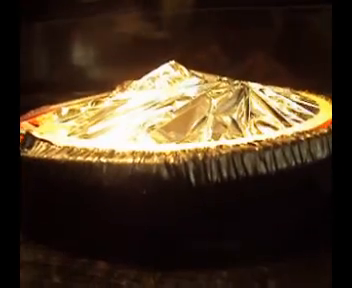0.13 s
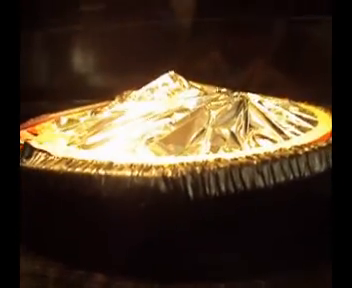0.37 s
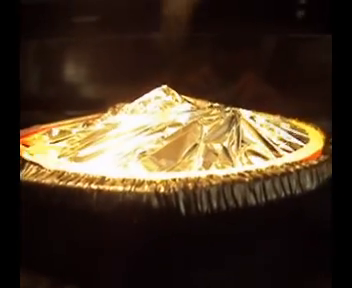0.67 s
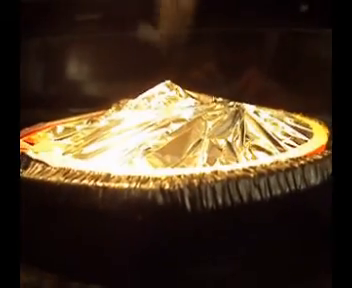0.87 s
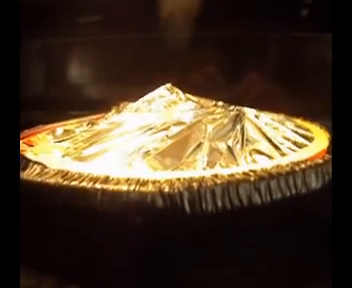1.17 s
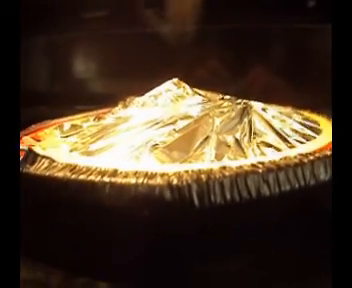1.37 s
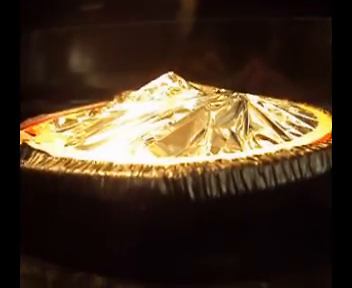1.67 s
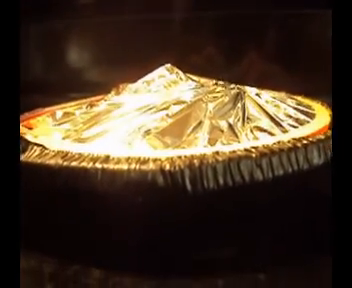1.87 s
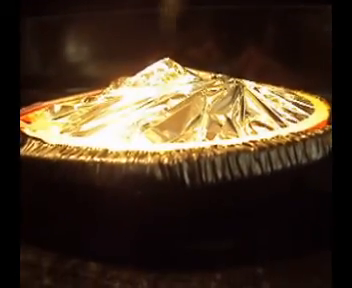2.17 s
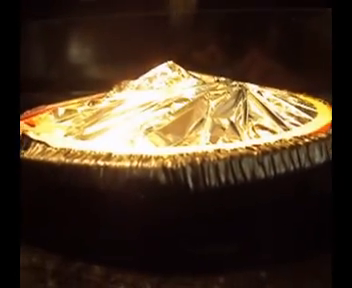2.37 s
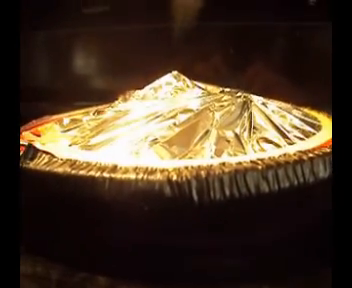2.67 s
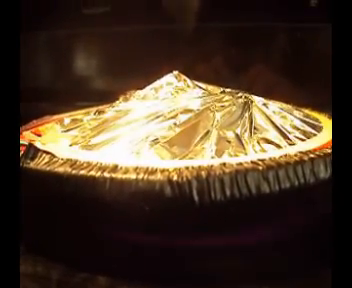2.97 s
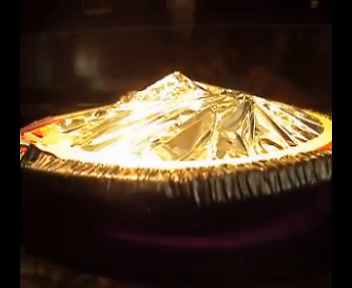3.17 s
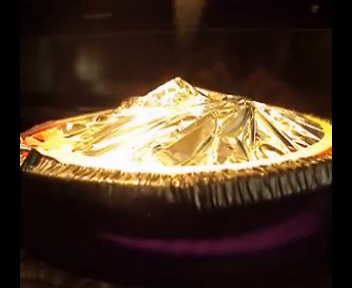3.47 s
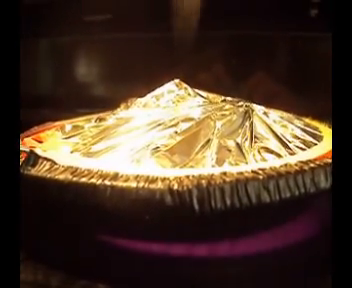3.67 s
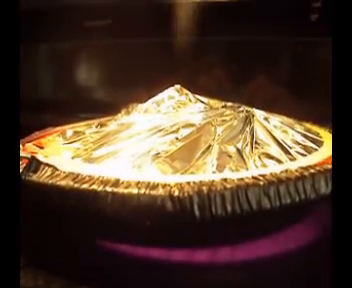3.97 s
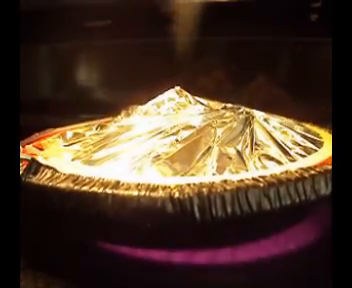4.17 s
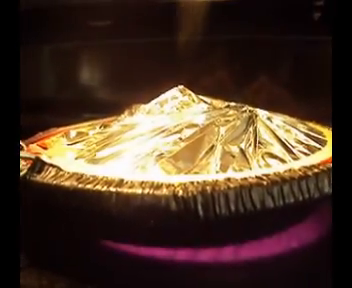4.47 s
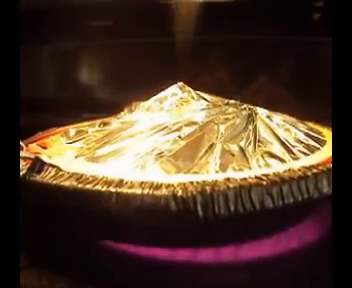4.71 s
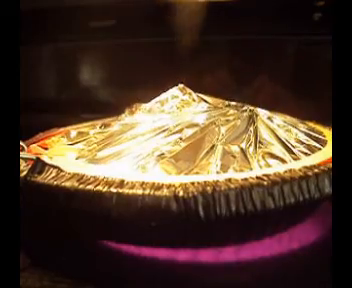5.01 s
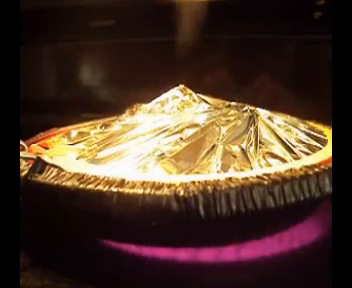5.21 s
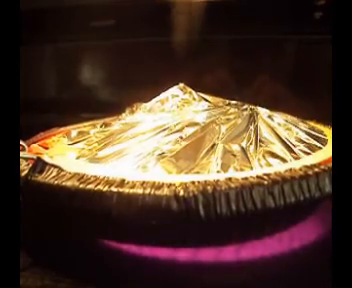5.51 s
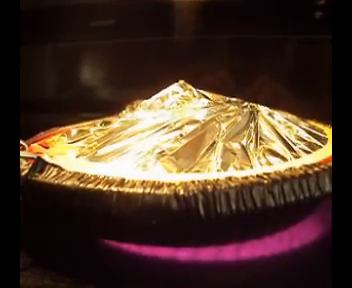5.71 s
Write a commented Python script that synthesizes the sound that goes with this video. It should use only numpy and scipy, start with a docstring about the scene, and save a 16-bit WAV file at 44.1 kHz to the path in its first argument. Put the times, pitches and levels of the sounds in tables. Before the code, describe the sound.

Popcorn pops in a foil-covered pan on a kitchen stove, heard through a close, slightly dull microphone. The first few pops are widely spaced, then they come more often, ending with a quick run of three and a tight pair. Each crack rings briefly in the metal, followed by kernels tapping and rattling and a slight foil rustle. Faint stove hiss and tiny spits of oil continue underneath, with a short room echo.

```python
"""A stove hisses faintly in a small kitchen; hot kernels shift in a shallow pan under a tent of foil.
At 0.6 s the first one pops: the hull cracks, its steam thumps the pan and kicks the foil, the kernel
flies into the tent and its neighbours rattle back. Fourteen more follow unevenly, with knocks between,
bunching up near 4.7 s and 5.7 s. A close, narrow-band microphone overloads on the loudest pops."""
import sys
import numpy as np
from scipy import signal
from scipy.fft import rfft, irfft
from scipy.io import wavfile

SR = 44100
rng = np.random.default_rng(int(sys.argv[2]) if len(sys.argv) > 2 else 0)


def store_wav(level_fs):
    """Save 16-bit WAV to argv[1]."""
    pcm = np.round(np.clip(np.atleast_2d(level_fs), -1, 1) * 32767)
    wavfile.write(sys.argv[1], SR, pcm.T.astype(np.int16))


N = 257984
AGE = np.arange(SR // 3) / SR   # time since a blow [s]
KNOCK_HZ = 1047   # usual pitch of struck foil

# bursting kernels: (time [s], steam swell [s], thump pitch [Hz], thump level [dB], pan pitch [Hz],
# pan level [dB], foil pitch [Hz], foil level [dB], husk level [dB], crack level [dB],
# rustle level [dB], flight to the foil [s], level of that hit [dB])
POPS = [(0.6141, 0.0046, 288, -19, 431.5, -19.5, 1026, -18.5, -24, -24.5, -49, .0174, -28.5),
        (0.9775, 0.0046, 148, -29.5, 481, -21.5, 1027, -9.5, -17, -24.5, -45, .0121, -29),
        (1.817, 0.00207, 302, -25, 520, -19, 1020, -21, -32, -42, -71, .0085, -28.5),
        (2.26, 0.0044, 190, -23, 396, -22, 952, -13.5, -22, -21.5, -36, .0162, -32),
        (2.5681, 0.0043, 171, -23, 487.6, -13.5, 970, -10, -17.5, -21, -30.5, .0120, -36),
        (2.8634, 0.0028, 182, -33, 465, -30.5, 1041, -13, -23.5, -20.5, -46, .0263, -32),
        (3.2643, 0.0025, 177, -25, 460, -24, 1023, -14, -16, -23, -39, .0127, -23),
        (3.6566, 0.0025, 143, -27.5, 534, -18, 1070, -11, -17, -15.5, -32, .0160, -29),
        (4.0162, 0.0046, 255, -26.5, 439, -21, 1082, -13.5, -25.5, -29.5, -42.5, .0156, -26),
        (4.5681, 0.0017, 218, -30, 525, -26, 1006, -16, -36, -28, -62, .0071, -20),
        (4.6774, 0.0042, 163, -29.5, 498, -24, 992, -13.5, -14.5, -16, -31, .0141, -23.5),
        (4.7767, 0.0047, 100, -31, 494, -22, 1040, -12, -16.5, -19.5, -52, .0138, -42),
        (5.404, 0.0038, 132, -22.5, 363, -23.5, 1040, -14.5, -22.5, -24, -35, .0070, -30),
        (5.692, 0.0043, 164, -22, 510, -23.5, 1034, -10.5, -17, -26.5, -38.5, .0172, -31),
        (5.7472, 0.0035, 154, -36, 539, -18.5, 1092, -17.5, -23, -24, -43, .0077, -17.5)]


def pops():
    """The hull cracks; a steam puff drives pan and foil; the kernel hits the foil, which rustles on."""
    out = np.zeros(N)
    for (s, swell_s, thump_hz, thump_db, pan_hz, pan_db, foil_hz, foil_db,
         husk_db, crack_db, rustle_db, flight_s, hit_db) in POPS:
        split = swell(0.00052 + swell_s * 0.18, steepness=0.47)
        add(out, s, at_level(crackle(split, low_hz=2200), crack_db))
        husk = gush(swell_s * 0.75, steepness=0.91) * rng.standard_normal(len(AGE))
        add(out, s, at_level(band(husk, 1148, 1840, order=3), husk_db))
        puff = gush(swell_s, steepness=1.13)
        add(out, s, at_level(ring(foil_hz, puff, rough=0.75), foil_db))
        add(out, s, at_level(ring(pan_hz, puff, rough=1.1), pan_db))
        # the sudden volume of steam lifts the whole tent once
        add(out, s + swell_s * 0.19, at_level(shove(thump_hz, octaves=1.12), thump_db))
        add(out, s, at_level(rustle(t60=0.54, uneven_db=3.5), rustle_db))
        add(out, s + flight_s, knock(foil_spot(), thud_db=hit_db - 7, ring_db=hit_db, tick_db=hit_db - 15))
    return out


def crackle(envelope, low_hz):
    """Bright fracture noise of splitting hull and crinkling foil."""
    # tone of the fracture: (frequency [Hz], relative level [dB])
    colour = [(1500, 1.5), (2400, -10.5), (3000, 6.5), (3450, 1), (3750, 2.5), (4300, -1), (5200, -0.5),
              (6500, -6)]
    return band(envelope * noise(colour, len(envelope)), low_hz, 7900, order=3)


def gush(peak_s, steepness):
    """Envelope of escaping steam: it builds to 1 at peak_s and is soon spent."""
    u = AGE / peak_s
    return (u * np.exp((1 - u * u) / 2)) ** steepness


def ring(hz, envelope, rough):
    """A damped swing of thin metal; its creases make the phase wander by `rough` radians rms."""
    wander = band(rng.standard_normal(len(envelope)), 50, 286)
    return envelope * np.sin(2 * np.pi * hz * AGE[:len(envelope)] + rough * wander / np.std(wander))


def shove(hz, octaves):
    """One pressure pulse that rebounds around hz; the fewer octaves it covers, the longer it swings."""
    edge_ratio = 2 ** (octaves / 2)
    return band(swell(0.067 / hz, steepness=3.8), hz / edge_ratio, hz * edge_ratio)


def rustle(t60, uneven_db):
    """Creased foil relaxes in little fits and starts."""
    fits = band(rng.standard_normal(len(AGE)), 30, 220)
    return crackle(decay(t60) * from_db(uneven_db * fits / np.std(fits)), low_hz=2000)


def knocks():
    """Single kernels land on foil and pan, hard enough to stand out."""
    # hard landings: (time [s], pitch [Hz], thud level [dB], ring level [dB], tick level [dB])
    landings = [(0.6418, 1100, -36.5, -34, -46.5), (0.7047, 1050, -61, -40, -65),
                (0.899, 1300, -63, -59, -52), (1.004, 1310, -33, -25, -27.5),
                (1.0503, 1170, -51, -32.5, -44), (1.0829, 990, -65, -37.5, -57),
                (1.2119, 980, -49, -46, -71), (1.809, 1300, -36, -31.5, -32.5),
                (1.8623, 1110, -39, -24.5, -35.5), (2.1166, 860, -39, -35.5, -48.5),
                (2.2525, 886, -33, -34, -60), (2.3308, 940, -62, -31, -56),
                (2.3775, 1000, -62, -32.5, -53.5), (2.5998, 1010, -25.5, -14.5, -41),
                (2.6233, 1050, -33, -24.5, -53), (2.9256, 1080, -47.5, -30.5, -50),
                (3.335, 1560, -44, -44, -49), (3.6911, 1120, -42, -20, -25), (3.714, 1240, -48, -28.5, -41),
                (3.806, 1120, -59, -41.5, -51), (4.0726, 1070, -57, -31.5, -44),
                (4.0993, 1215, -57, -28.5, -55), (4.1116, 1060, -60, -34, -51),
                (4.5807, 1080, -42, -23, -30.5), (4.6097, 1420, -49, -38, -40.5),
                (4.6339, 1110, -51, -29, -50), (4.7148, 1380, -58, -33, -32),
                (4.728, 1240, -49, -34.5, -44), (4.743, 1050, -54, -31.5, -49),
                (4.805, 1114, -40, -32.5, -61), (4.835, 1040, -46, -40, -59),
                (5.4191, 1030, -27.5, -19, -40.5), (5.4423, 1226, -43, -29, -31),
                (5.476, 1240, -61.5, -36.5, -42), (5.582, 1400, -69, -48.5, -52),
                (5.7619, 1100, -37, -23, -26.5), (5.767, 1220, -53, -20, -43),
                (5.8211, 1080, -57, -35, -43.5)]
    out = np.zeros(N)
    for s, hz, thud_db, ring_db, tick_db in landings:
        add(out, s, knock(hz, thud_db, ring_db, tick_db))
    return out


def knock(hz, thud_db, ring_db, tick_db):
    """A kernel's weight gives a short ring, a thud and a tick; tauter foil rings higher, ticks brighter."""
    tick_edge_hz = min(1370 * (hz / KNOCK_HZ) ** 4.4, 3700)
    foil = ring(hz, brief(swell(0.00062, steepness=0.85)), rough=0.71)
    thud = brief(shove(hz=455, octaves=1.11))
    tick = crackle(brief(decay(t60=0.011)), low_hz=tick_edge_hz)
    return at_level(foil, ring_db) + at_level(thud, thud_db) + at_level(tick, tick_db)


def foil_spot(spread=0.057):
    """Pitch of the foil where a kernel happens to land."""
    return KNOCK_HZ * np.exp(spread * rng.standard_normal())


def settling(count, span_s=0.17, fade_db_per_s=150, spread_db=2.5, usual_rustle_db=-39.5):
    """After each pop the jostled kernels rattle back at uneven moments, ever sparser and softer."""
    out = np.zeros(N)
    for s, *_, rustle_db, _, _ in POPS:
        first_db = -32.5 + 0.3 * (rustle_db - usual_rustle_db)   # a pop that rustles more jostles harder
        waits_s = span_s * ((np.arange(count) + rng.random(count)) / count) ** 1.5
        for wait_s in waits_s:
            db = first_db - fade_db_per_s * wait_s + spread_db * rng.standard_normal()
            tap = knock(foil_spot(), thud_db=db - 22, ring_db=db, tick_db=db - 19.5)
            add(out, s + 0.014 + wait_s, tap)
    return out


def stirring(per_s, ring_db, tick_db):
    """All along, hot kernels shift and the oil spits, faintly and at random."""
    out, chances = np.zeros(N), rng.random((200, 5))
    for when, luck, ring_softness, pitch, spit_softness in chances:
        if luck < per_s * N / SR / len(chances):
            s = when * N / SR
            shift = ring(850 + 500 * pitch, brief(swell(0.00091, steepness=0.86)), rough=0.41)
            spit = crackle(brief(decay(t60=0.008)), low_hz=2500)
            add(out, s, at_level(shift, ring_db - 9 * ring_softness))
            add(out, s, at_level(spit, tick_db - 12 * spit_softness))
    return out


def tent(x):
    """The hollow under the foil rings on briefly after each blow."""
    # air and foil resonances: (frequency [Hz], bandwidth [Hz], relative level [dB])
    resonances = [(313, 100, -12.5), (520, 28, -18), (877, 67, 7), (1100, 370, -12), (1307, 36, 2),
                  (1550, 190, -3.5), (1940, 260, 0.5)]
    out = np.zeros(N)
    for k, (hz, width_hz, db) in enumerate(resonances):
        radius = np.exp(-np.pi * width_hz / SR)
        zeros = np.array([1, 0, -1]) * (1 - radius ** 2) / 2
        poles = [1, -2 * radius * np.cos(2 * np.pi * hz / SR), radius ** 2]
        out += (-1) ** k * from_db(db) * signal.lfilter(zeros, poles, x + 1e-18)   # polarity alternates
    return out


def kitchen(x, near_db, tail_db):
    """Quick reflections off hob and wall, then the diffuse tail of the room."""
    # tone of the echo: (frequency [Hz], relative level [dB])
    colour = [(50, -2.5), (140, 2), (500, 3.5), (1000, -0.5), (1800, 1.5), (3000, -0.5), (5500, 0.5)]
    onset = 1 - np.exp(-(AGE / 0.0026) ** 2)
    near = noise(colour, len(AGE)) * onset * decay(t60=0.056)
    tail = noise(colour, len(AGE)) * onset * decay(t60=0.42)
    echo = from_db(near_db) * near / np.linalg.norm(near) + from_db(tail_db) * tail / np.linalg.norm(tail)
    return signal.fftconvolve(x, echo)[:N]


def stove():
    """A bed of gently drifting hiss with a faint mains hum in it."""
    # tone of the hiss of stove and room: (frequency [Hz], relative level [dB])
    colour = [(15, -5.5), (50, 0), (150, -5), (300, -3), (750, -6.5), (1020, -4), (1300, -6), (1450, -13),
              (1900, -12.5), (2350, -21), (3100, -15.5), (4400, -18.5), (5100, -14.5), (6000, -17.5)]
    # drift of the hiss: (time [s], rms level [dB])
    drift = [(0, -48.5), (.5, -51), (1.401, -50.5), (2.2, -52.5), (2.801, -49.5), (3.5, -49), (4.4, -50.5),
             (5.3, -51.5), (5.85, -49.5)]
    # partials of the mains hum: (frequency [Hz], rms level [dB])
    partials = [(59.6, -67.5), (119.2, -67)]
    t = np.arange(N) / SR
    hiss = from_db(np.interp(t, *np.transpose(drift))) * noise(colour, N)
    hum = sum(np.sqrt(2) * from_db(db) * np.sin(2 * np.pi * (hz * t + rng.random())) for hz, db in partials)
    return hiss + hum


def swell(peak_s, steepness):
    """Envelope that rises to 1 at peak_s and dies away."""
    u = AGE / peak_s
    return (u * np.exp(1 - u)) ** steepness


def decay(t60):
    """Envelope that falls 60 dB in t60 seconds."""
    return from_db(-60 * AGE / t60)


def brief(x):
    """Only the first 30 ms: a light tap is over by then."""
    return x[AGE < 0.03]


def noise(colour, size):
    """Noise of rms 1 with the given colour."""
    hz, db = np.transpose(colour)
    bins_hz = np.maximum(np.fft.rfftfreq(size, 1 / SR), 1)
    gain = from_db(np.interp(np.log(bins_hz), np.log(hz), db))
    x = irfft(rfft(rng.standard_normal(size)) * gain, size)
    return x / np.std(x)


def band(x, low_hz, high_hz, order=2):
    """Causal band-pass."""
    return signal.sosfilt(signal.butter(order, [low_hz, high_hz], "band", fs=SR, output="sos"), x + 1e-18)


def from_db(db):
    """Decibels to gain."""
    return 10 ** (np.asarray(db) / 20)


def at_level(x, db):
    """Give a short sound the energy of 10 ms at this rms level."""
    return from_db(db) * x * np.sqrt(0.01 * SR / (np.sum(x ** 2) + 1e-20))


def add(track, s, sound):
    """Mix a sound into the track from time s on."""
    start = round(s * SR)
    track[start:start + len(sound)] += sound[:max(N - start, 0)]


def scene():
    """Blows in the pan, coloured by the tent and echoed by the kitchen, over the stove."""
    blows = pops() + knocks() + settling(count=7) + stirring(per_s=22, ring_db=-51, tick_db=-59)
    pan = blows + from_db(-9) * tent(blows)
    return (pan + kitchen(pan, near_db=-10, tail_db=-16.5) + stove())[None]


def record(dry, bass_hz=35, treble_hz=5572, ceiling=0.85, hardness=16, cutoff_hz=16300, offset=-0.0021):
    """The narrow-band microphone overloads with a tight knee, loses the top and sits slightly off zero."""
    thinned = signal.sosfilt(signal.butter(1, bass_hz, "high", fs=SR, output="sos"), dry)
    narrow = signal.sosfilt(signal.butter(30, treble_hz, fs=SR, output="sos"), thinned)
    clipped = narrow / (1 + np.abs(narrow / ceiling) ** hardness) ** (1 / hardness)
    return signal.sosfilt(signal.ellip(10, .1, 80, cutoff_hz, fs=SR, output="sos"), clipped) + offset


dry = scene()
out = record(dry)
store_wav(out)
```